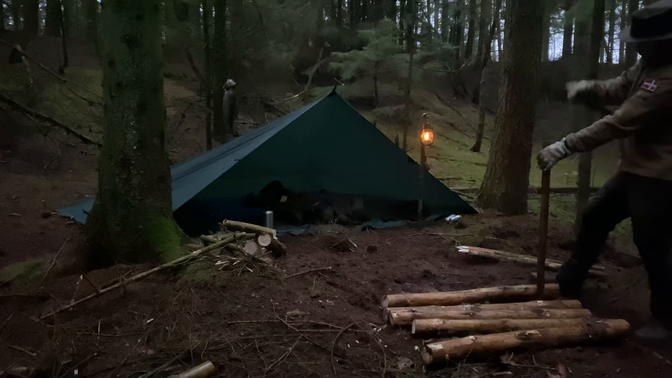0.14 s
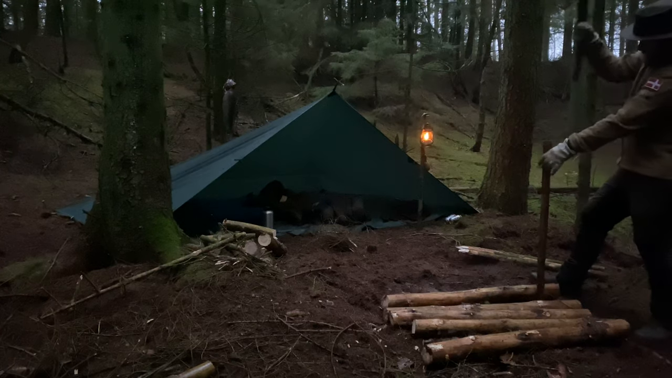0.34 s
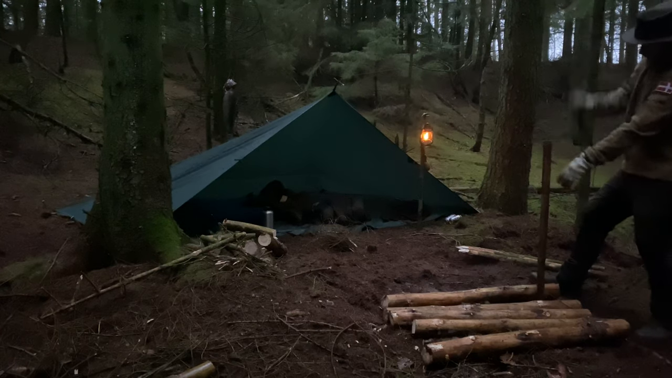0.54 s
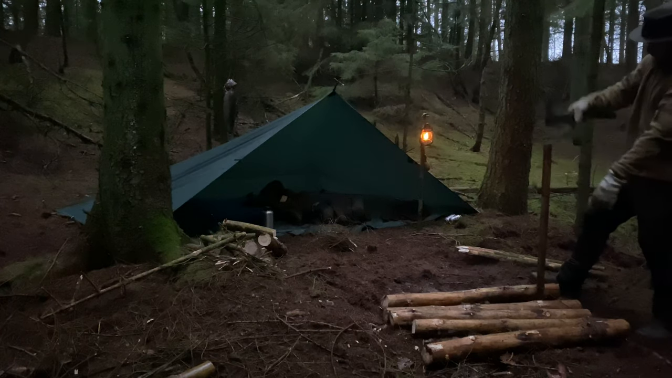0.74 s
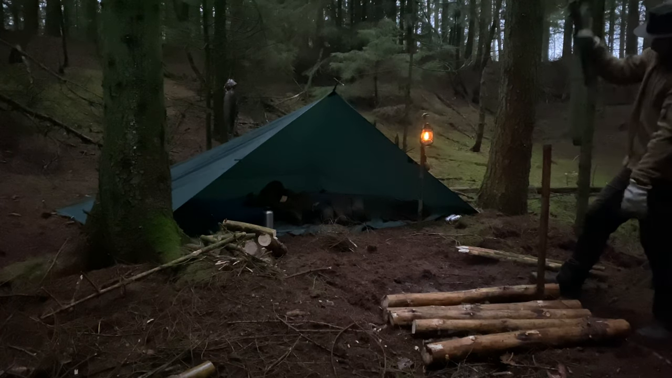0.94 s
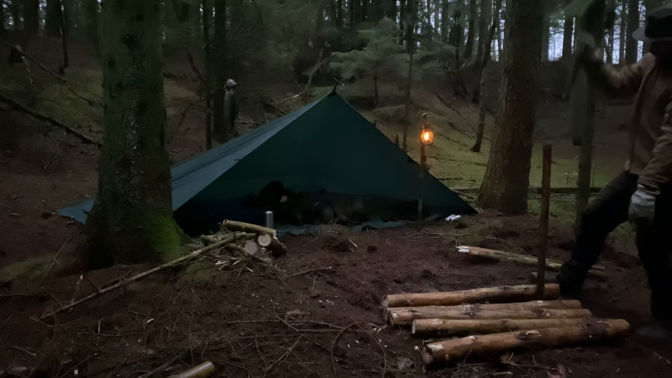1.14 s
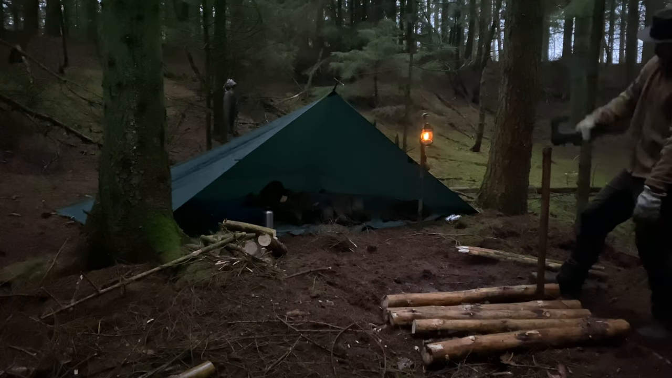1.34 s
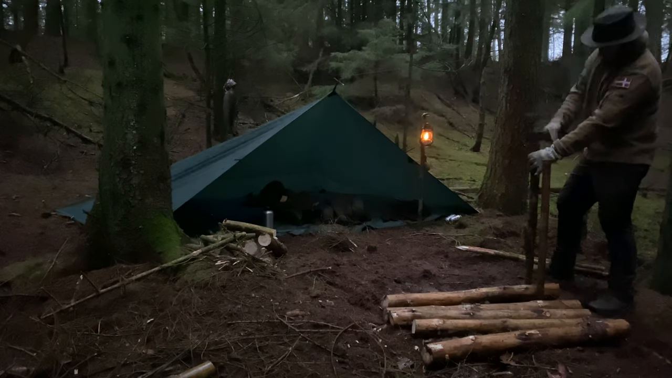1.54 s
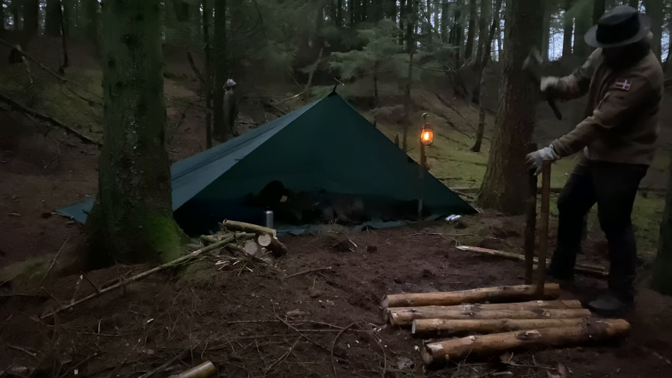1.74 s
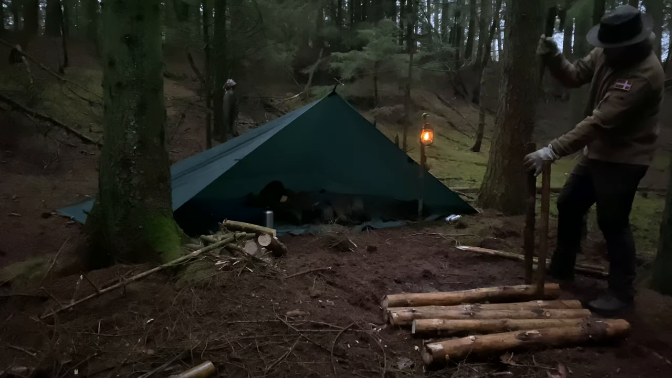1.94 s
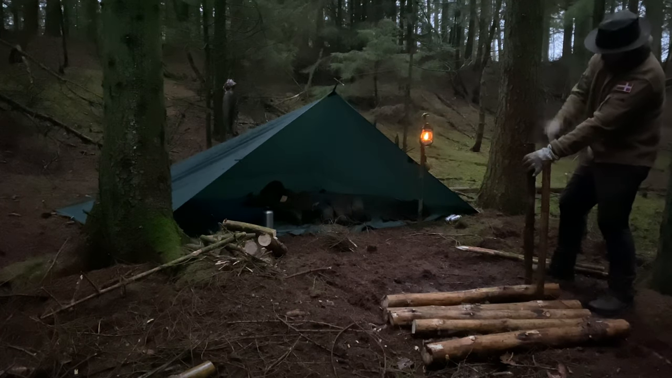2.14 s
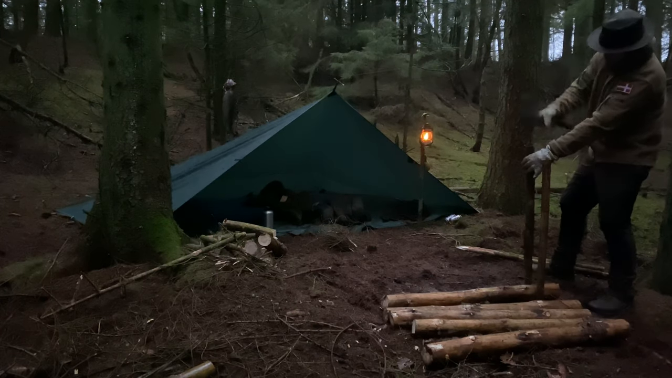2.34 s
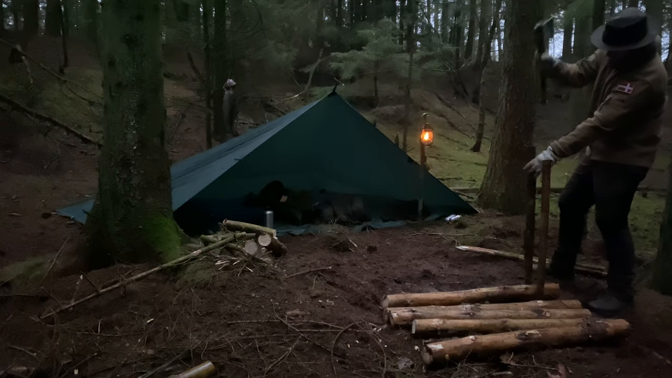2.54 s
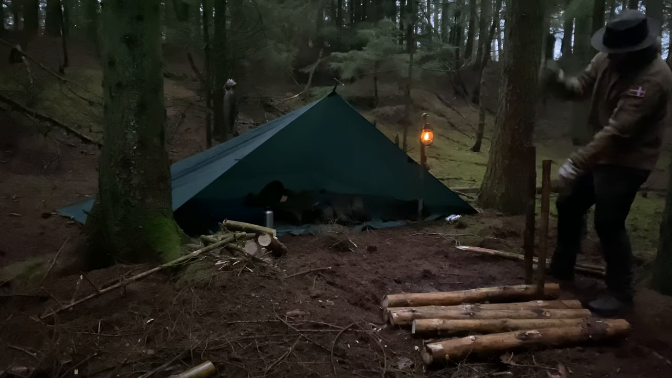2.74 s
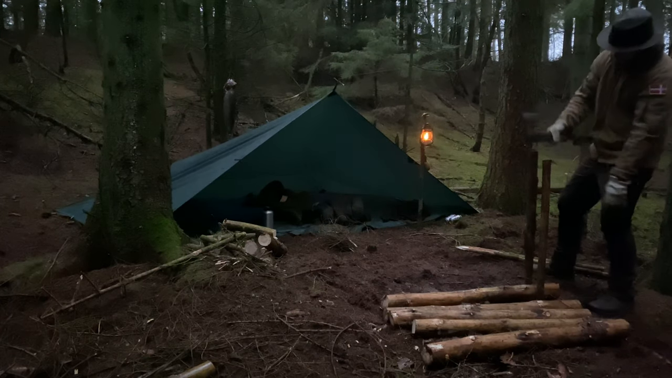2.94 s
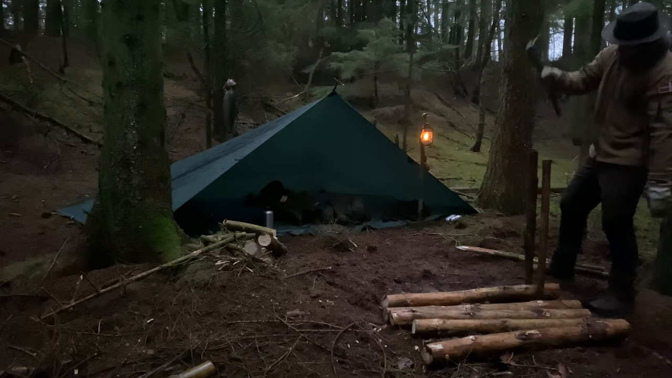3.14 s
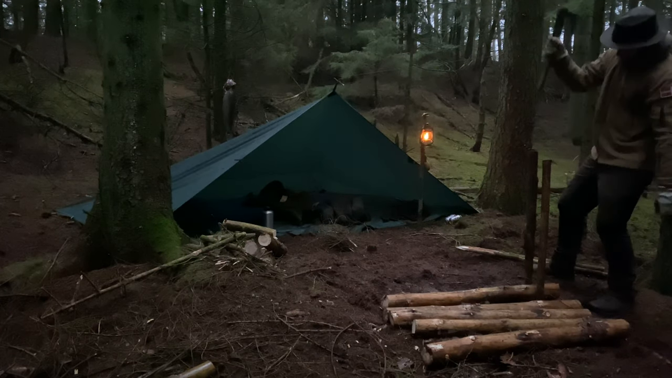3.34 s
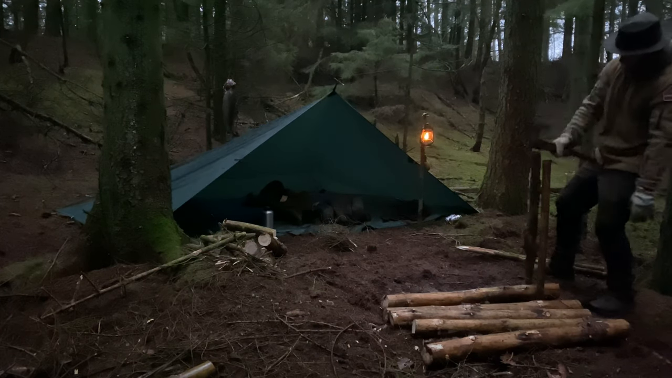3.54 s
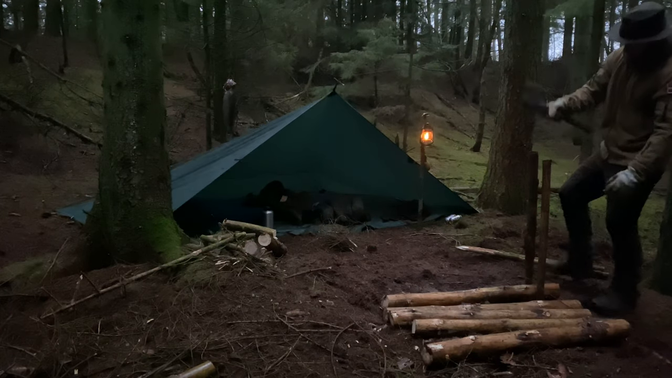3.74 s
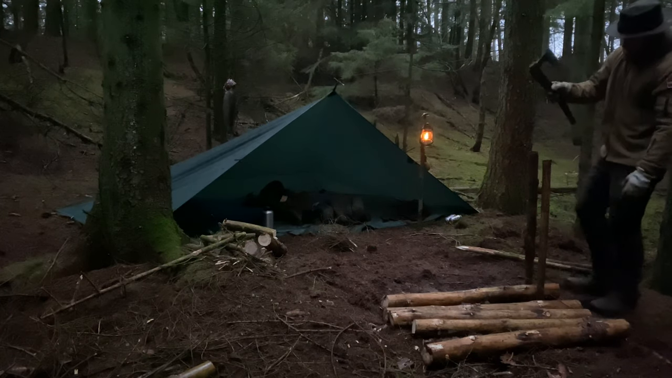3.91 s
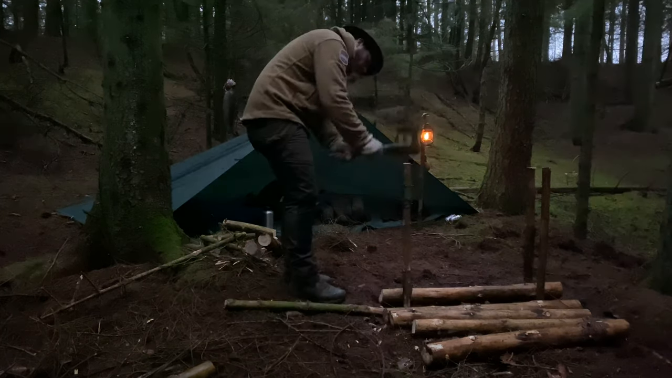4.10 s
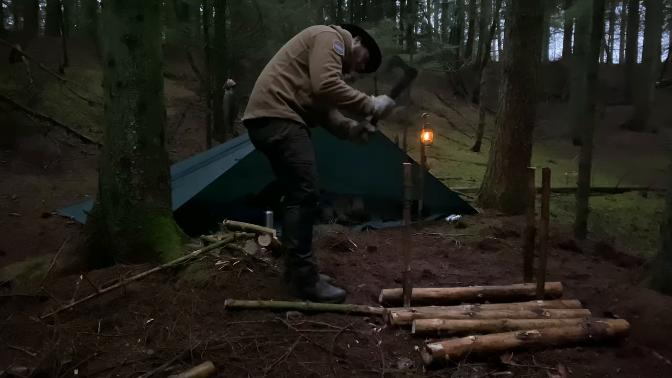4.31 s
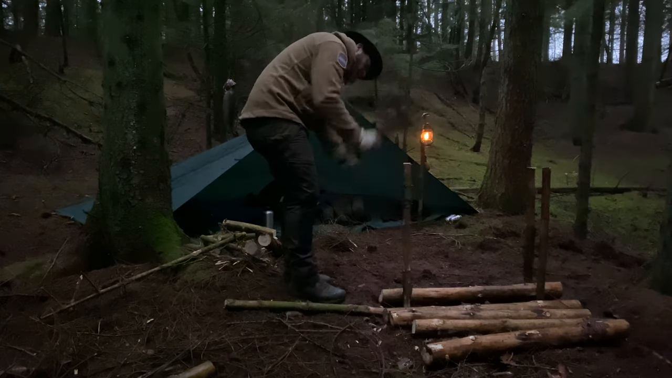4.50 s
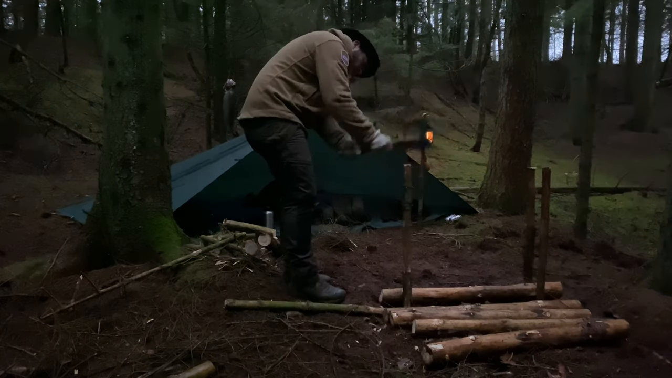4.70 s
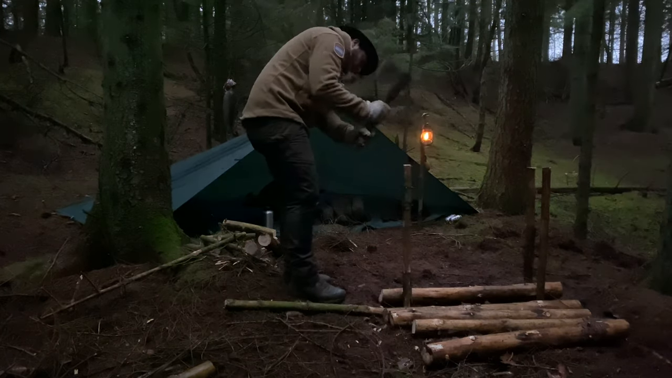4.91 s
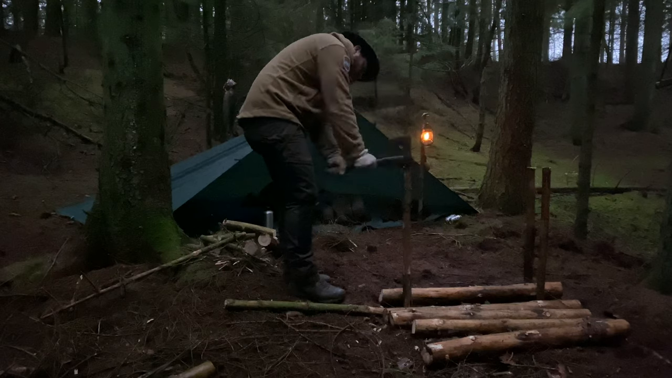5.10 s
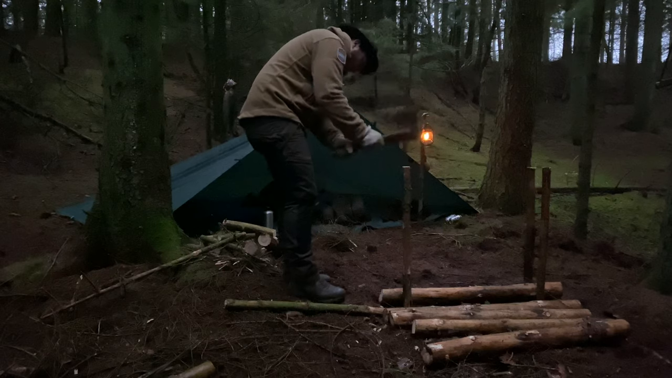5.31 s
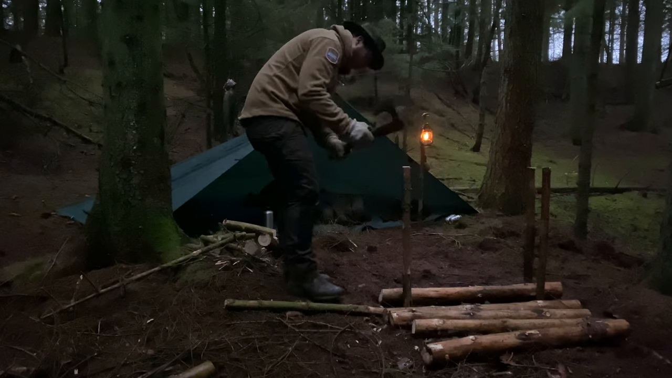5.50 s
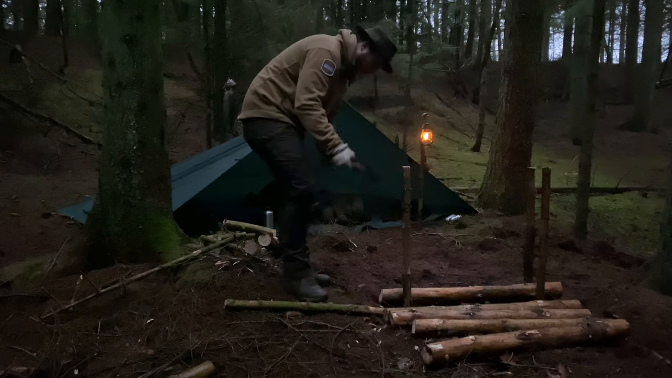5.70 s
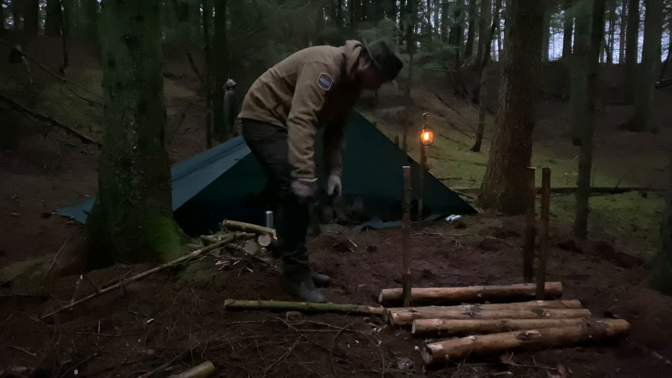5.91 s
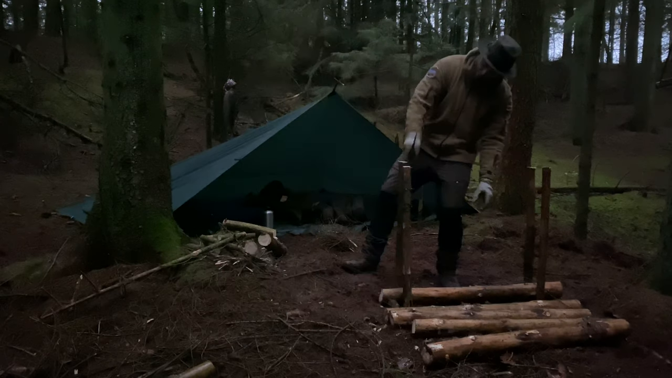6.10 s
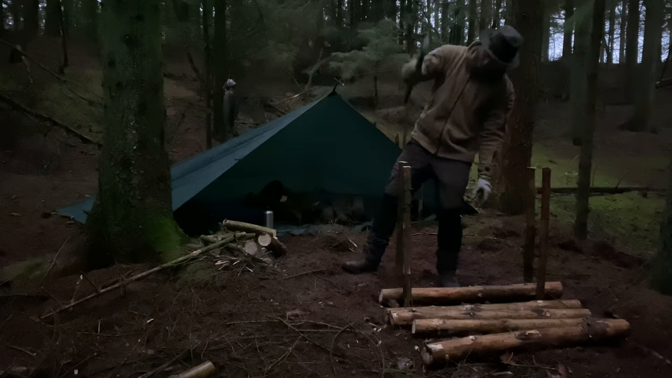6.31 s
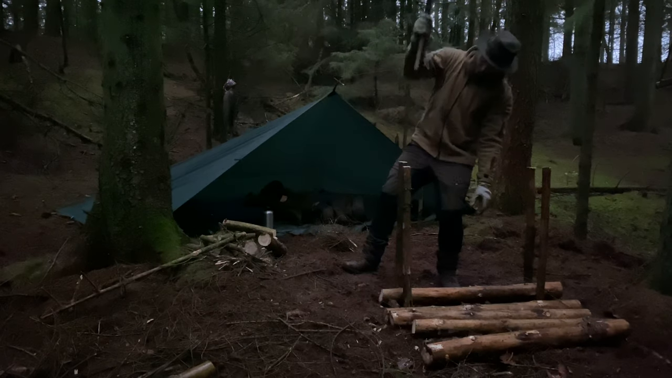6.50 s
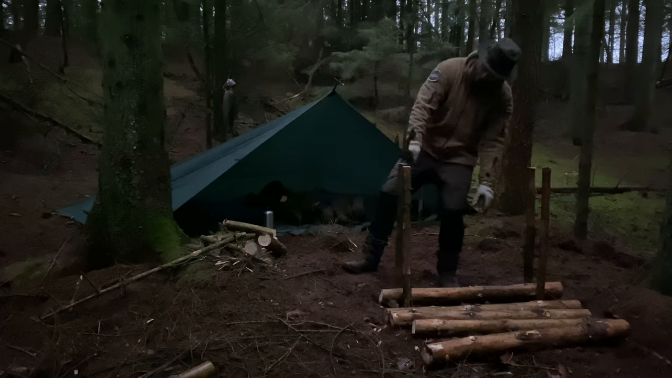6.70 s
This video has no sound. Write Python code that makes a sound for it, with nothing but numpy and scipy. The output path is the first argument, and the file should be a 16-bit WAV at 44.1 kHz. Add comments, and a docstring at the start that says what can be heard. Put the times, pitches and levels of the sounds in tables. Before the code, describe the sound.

Nine spaced, dry axe-back blows on wooden stakes, the last with deep earthy thuds, ring briefly among trees over low wind rumble.

```python
"""Wooden stakes are pounded into soft forest ground with the back of an axe.
Each blow is a burst of cracking noise, a few decaying wood modes, a low thud of the soil and an echo in
frequency-dependent decaying noise. At times an echo breaks off and one enters part-way through its decay.
Air buffets the microphone as short pressure swings over low noise; distant trees hush, and twigs tick
underfoot as tiny noise bursts."""
import sys
import numpy as np
from scipy import signal
from scipy.fft import rfft, irfft, next_fast_len
from scipy.io import wavfile
from scipy.ndimage import map_coordinates

SR = 44100
rng = np.random.default_rng(int(sys.argv[2]) if len(sys.argv) > 2 else 0)


def dump_mix(stems):
    """Bounce the given channels to the path in sys.argv[1] as a 16-bit WAV at rate SR."""
    frames = np.atleast_2d(stems).T  # one column per channel
    limited = np.clip(frames, -1, 1)  # hard clip at full scale
    pcm = np.round(limited * 32767).astype(np.int16)
    wavfile.write(sys.argv[1], SR, pcm)


N = 297663

# Blows of the axe: (time [s], stake [name], knock level [dB], crack level [dB],
# treble tilt [dB], ground thud level [dB], echo level [dB])
BLOWS = [(0.6014, "A", -11.5, -15.5, -1, -22.5, -36.5), (1.2677, "A", -10.5, -12.5, 0.5, -17.5, -35),
         (2.1710, "B", -7.5, -16, -3.5, -22, -36.5), (2.8546, "B", -11.5, -12, -2, -23, -38.5),
         (3.5217, "B", -7.5, -14, -6, -22.5, -39), (4.5603, "C", -8, -10.5, -1.5, -16.5, -38),
         (5.0923, "C", -9, -13.5, 0, -10.5, -40), (6.0463, "D", -22.5, -20.5, -3, -6.5, -34.5),
         (6.6840, "D", -9.5, -9.5, 3, -3.5, -41.5)]
# Echoes that enter part-way: (time [s], stake [name], age of the echo [s], level [dB])
ECHO_ENTRIES = [(0, "A", 0.051, -35), (1.591, "B", 0.14, -32.5), (4.01, "C", 0.018, -37)]
STAKE_NAMES = "ABCD"  # the order of the stakes in the per-stake tables
# Vibration modes of each stake: (frequency [Hz], relative level [dB], 60 dB decay time [s])
STAKE_MODES = [
    [(770, -16, .03), (1028, -1.5, .045), (1140, -11.5, .03), (1374, -6.5, .035), (1584, -3.5, 0.047),
     (1810, -6, 0.049), (1993, -1.5, .045), (2870, -12.5, .03)],
    [(565, -16, 0.014), (720, -13, .03), (1012, -12.5, .03), (1286, -11.5, 0.025), (1660, -10, .04),
     (1880, -18.5, 0.026), (2475, 1, .058), (2645, -4.5, 0.049), (5190, -21, .03)],
    [(620, -6.5, 0.02), (720, 2, 0.029), (1412, -5.5, 0.02), (1620, -2, 0.014), (1850, -6, .025),
     (2304, -10.5, .025), (3214, -6, .025), (3520, -9.5, 0.028)],
    [(529, 1.5, 0.027), (774, -6.5, 0.042), (1430, 1.5, 0.024), (1848, -6, 0.03), (2190, -9, 0.026),
     (2790, -3, 0.02), (3210, -1, 0.01)],
]
# Spectrum of steel cracking on each stake's head: (frequency [Hz], relative density [dB per Hz])
CRACK_SPECTRA = [
    [(60, -18.5), (200, -3), (500, -5), (1100, -2), (1900, 2), (2300, -7.5), (3300, -5), (5500, -17.5),
     (8000, -19.5), (11000, -15), (15000, -28.5)],
    [(60, -17), (200, -7), (400, -11.5), (650, -1.5), (1200, -5), (2500, 0.5), (3200, -5.5), (4200, -15),
     (5700, -9), (8000, -22.5), (11000, -17.5), (15000, -27)],
    [(60, -21), (200, 2.5), (450, 1), (700, 2), (1000, -4), (1600, -3.5), (3400, 0.5), (4500, -14.5),
     (7000, -28), (11000, -20), (15000, -29.5)],
    [(60, -18.5), (250, -17.5), (550, 6.5), (1000, -10), (1800, 2.5), (3200, 1), (4500, -19), (7000, -21.5),
     (11000, -19.5), (15000, -23)],
]
# Where each stake stands: (left-right level difference [dB], lag of the left side [s])
STAKE_PLACES = [(-8.5, .0001), (-3.5, 0.0037), (-3.5, 0), (0, 0.0041)]
# Spectrum of each stake's echo: (frequency [Hz], relative density [dB per Hz])
ECHO_SPECTRA = [
    [(350, -47.5), (600, -14.5), (1550, -9), (1930, -5), (2370, -17), (5630, -21), (10200, -29),
     (12200, -45.5), (13800, -35.5), (14900, -41.5), (16000, -70)],
    [(350, -44.5), (600, -15), (1350, -10), (1610, -9), (1750, -12), (2440, -4), (3120, -13.5),
     (10500, -24), (12000, -43.5), (13900, -35), (16000, -71)],
    [(350, -43.5), (600, -9.5), (737, -0.5), (919, -9), (1290, -7.5), (5120, -9), (8500, -20.5),
     (10600, -17.5), (12000, -47), (13800, -26), (16000, -50.5)],
    [(350, -35.5), (600, -3.5), (1230, -6), (1850, -2), (4460, -11.5), (9360, -19.5), (11200, -23.5),
     (12000, -46.5), (12800, -30), (14500, -24), (16000, -49)],
]
# Note each stake sends sideways into the trees:
# (frequency [Hz], mean level against the echo noise [dB], overtone level against the note [dB])
ECHO_NOTES = [(1887, -12, -21.5), (2470, -8.5, -9), (2605, -19.5, 2), (2250, -20, -24)]
# Reverberation of the forest: (frequency [Hz], 60 dB decay time [s])
FOREST_DECAY = [(300, 0.25), (1000, 0.83), (2200, 1.0), (4000, 0.82), (7000, 0.53), (10000, .5),
                (15000, .39)]
# Strongest puffs of air: (time [s], base level [dB], slow swing against the flick, before gains [dB])
PUFFS = [(0.223, -29, -8), (0.334, -30, -6), (0.38, -21.5, -5.5), (0.608, -18, -8.5), (0.961, -22.5, -6),
         (1.081, -26, -9.5), (1.114, -22, -9), (1.894, -24.5, -9.5), (2.102, -26.5, -6.5), (2.409, -29, -9),
         (3.025, -26, -9), (3.333, -26.5, -11), (4.391, -33.5, -4), (4.465, -26, -10.5), (5.699, -29, -9.5),
         (6.61, -26.5, 0)]
# Course of the breeze, before gains: (time [s], rumble level [dB], flutter level [dB])
BREEZE_COURSE = [(0.0, -54.5, -59), (0.52, -51, -53), (1.5, -47.5, -48.5), (1.65, -51, -48),
                 (2.3, -57, -54.5), (2.85, -47.5, -47.5), (3.26, -49.5, -52.5), (3.54, -50, -49.5),
                 (3.91, -51, -50), (4.13, -62, -67), (4.96, -59.5, -67.5), (5.2, -46.5, -52),
                 (5.58, -55.5, -52), (5.87, -48, -59.5), (5.98, -50, -58.5), (6.39, -48, -68.5),
                 (6.54, -40, -59.5), (6.65, -38.5, -48.5)]
# Spectrum of the deep turbulence: (frequency [Hz], relative density [dB per Hz])
RUMBLE_SPECTRUM = [(20, -24), (35, -13.5), (55, 3), (90, 1), (140, -2), (220, -18), (400, -62.5)]
# Spectrum of the quicker turbulence: (frequency [Hz], relative density [dB per Hz])
FLUTTER_SPECTRUM = [(70, -21.5), (140, -0.5), (220, 0.5), (320, -10.5), (450, -20), (700, -41),
                    (1200, -70.5)]
# Spectrum of distant trees: (frequency [Hz], relative density [dB per Hz])
HUSH_SPECTRUM = [(100, -10.5), (300, -1), (700, -6), (1500, -12), (2200, -19.5), (4000, -28.5),
                 (7000, -36.5), (11000, -40.5), (16000, -51.5)]
# Loudest twigs underfoot: (time [s], level before gain [dB], pitch [Hz])
TWIGS = [(0.3299, -53.5, 4760), (0.8613, -48, 4080), (3.9434, -52, 14100), (5.7314, -51.5, 9130),
         (6.574, -43, 7740), (6.6314, -59, 4510)]

# Small eddies: rate, level over the breeze and its scatter
EDDIES_PER_S, EDDY_DB, EDDY_SPREAD_DB = 12, 16.5, 2
# Nominal pitch range of their flicks, nominal pitch of their slow swings
EDDY_LOW_HZ, EDDY_HIGH_HZ, EDDY_SLOW_HZ = 127, 290, 78
SWING_LAG_S = .004  # delay of the slow swing in a puff or eddy
# Fainter twig snaps at random moments: rate, mean level and its scatter, median pitch
FAINT_SNAPS_PER_S, FAINT_SNAP_DB, FAINT_SNAP_SPREAD_DB, FAINT_SNAP_HZ = 1.4, -61.5, 1.5, 5150
TOP_HZ = 16400  # nothing is passed above this


def amp(db):
    """Logarithmic level: decibels become an amplitude ratio."""
    return 10 ** (np.asarray(db) / 20)


def unit(x):
    """Normalization of power: scale to rms 1."""
    return x / np.sqrt(np.mean(x ** 2) + 1e-20)


def along(points, hz):
    """Logarithmic pitch scale: interpolate (frequency [Hz], value) points along it."""
    f, value = np.transpose(points)
    return np.interp(np.log(hz + 1), np.log(f + 1), value)


def filtered(x, response):
    """Linear filtering: multiply the spectrum of x by a response of frequency."""
    n = x.shape[-1]
    padded = next_fast_len(n + 8192)
    spectrum = rfft(x, padded) * response(np.fft.rfftfreq(padded, 1 / SR))
    return irfft(spectrum, padded)[..., :n]


def noise(spectrum, n, alike):
    """Partial coherence: coloured stereo noise of rms 1, sharing the power fraction alike."""
    share = np.clip(alike, 0, 1)
    common = np.sqrt(share) * rng.standard_normal(n)
    separate = np.sqrt(1 - share) * rng.standard_normal((2, n))
    return unit(filtered(common + separate, lambda hz: amp(along(spectrum, hz))))


def wobble(rate, n):
    """Slow random modulation: a smooth curve through rate random knots a second."""
    knots = rng.standard_normal(int(n * rate / SR) + 4)
    return map_coordinates(knots, [np.arange(n) * rate / SR])


def fade(t, t60):
    """Exponential decay: 60 dB in t60, at full level before t = 0."""
    return np.exp(-np.log(1000) * np.maximum(t, 0) / t60)


def onset(t, time_constant):
    """Exponential approach: rise from silence towards full level."""
    return 1 - np.exp(-t / time_constant)


def panned(db):
    """Interaural level difference: left and right gains that differ by db."""
    return amp([[db / 2], [-db / 2]])


def add(out, s, x):
    """Superposition: mix x into out from time s."""
    start = max(round(s * SR), 0)
    out[:, start:start + x.shape[1]] += x[:, :N - start]


def chance_times(per_s):
    """Jittered timing: one random moment in each slot of 1 / per_s seconds."""
    slots = np.arange(int(per_s * N / SR))
    return (slots + rng.random(len(slots))) / per_s


def spectral_line(hz, width_hz, n):
    """Narrow-band resonance: stereo noise of rms 1 gathered around one frequency."""
    return unit(filtered(rng.standard_normal((2, n)), lambda f: 1 / (1 + ((f - hz) / width_hz) ** 2)))


def echo(stake, width_hz=55, note_t60=1.5, near_db=3):
    """Diffuse reverberation off trunks: lows and high treble die sooner than the middle; the note lasts."""
    n = 3 * SR // 2
    t = np.arange(n) / SR
    # each band of the noise decays at its own rate
    hz, frames, bands = signal.stft(noise(ECHO_SPECTRA[stake], n, alike=.05), SR, nperseg=256)
    decay = fade(frames, along(FOREST_DECAY, hz)[:, None])
    wash = signal.istft(bands * decay, SR, nperseg=256)[1][:, :n]
    note_hz, note_db, overtone_db = ECHO_NOTES[stake]
    fundamental = spectral_line(note_hz, width_hz, n) * fade(t, note_t60)
    overtone = spectral_line(2 * note_hz, 2 * width_hz, n) * fade(t, 0.54 * note_t60)
    note = fundamental + amp(overtone_db) * overtone
    # near trunks answer first and loudest, far ones in uneven clumps
    near = 1 + amp(near_db) * fade(t, 0.2)
    clumps = amp(wobble(45, n) - 4.5)
    return (wash + amp(note_db + 2 * wobble(20, n)) * note) * onset(t, 0.0027) * near * clumps


def entering_echoes():
    """Late reverberation: echoes that enter part-way through their decay."""
    out = np.zeros((2, N))
    for s, name, age, db in ECHO_ENTRIES:
        tail = echo(STAKE_NAMES.index(name))[:, round(age * SR):]
        add(out, s, amp(db) * tail * onset(np.arange(tail.shape[1]) / SR, 0.0023))
    return out


def breeze(rumble_gain_db=6.0, flutter_gain_db=-3, hush_db=-59.5, hush_follows=0.28):
    """Turbulent pressure noise: lumpy low wind, over a hush of distant trees that swells a little with it."""
    knots, *levels = np.transpose(BREEZE_COURSE)
    rumble_db, flutter_db = [np.interp(np.arange(N) / SR, knots, level) for level in levels]
    lumps = wobble(28, N)
    rumble = amp(rumble_db + lumps + rumble_gain_db) * noise(RUMBLE_SPECTRUM, N, alike=.3)
    flutter = amp(flutter_db + 8.3 * lumps + flutter_gain_db) * noise(FLUTTER_SPECTRUM, N, alike=0.94)
    hush_level_db = hush_db + hush_follows * (flutter_db - flutter_db.mean())
    hush = amp(hush_level_db) * noise(HUSH_SPECTRUM, N, alike=.2)
    return (rumble + flutter) * panned(3) + hush


def swing(hz, cycles=.8):
    """Vortex pressure pulse: a swing of a cycle or two, a little different on each side."""
    turns = hz * np.exp(rng.normal(0, .12)) * np.arange(SR // 8) / SR
    swell = (turns / cycles) ** 3 * np.exp(3 - 3 * turns / cycles)  # peaks at 1 after the given cycles
    phase = rng.uniform(0, 2 * np.pi) + rng.normal(0, 0.28, (2, 1))
    return swell * np.sin(2 * np.pi * turns + phase)


def eddies(slow_db=-3):
    """Random vortex impacts: small eddies bump the microphone, harder as the breeze grows."""
    out = np.zeros((2, N))
    knots, rumble_db, flutter_db = np.transpose(BREEZE_COURSE)
    for s in chance_times(EDDIES_PER_S):
        size_db = EDDY_DB + rng.normal(0, EDDY_SPREAD_DB)
        flick_db = np.interp(s, knots, flutter_db) + size_db
        add(out, s, amp(flick_db) * swing(rng.uniform(EDDY_LOW_HZ, EDDY_HIGH_HZ)))
        swing_db = np.interp(s, knots, rumble_db) + size_db + slow_db
        add(out, s + SWING_LAG_S, amp(swing_db) * swing(EDDY_SLOW_HZ))
    return out * panned(2.9)


def puffs(flick_hz=245, slow_hz=80, flick_db=-1, slow_db=6, trail_db=-8, count=3):
    """Gust breaking into vortices: a quick flick, a slow swing and a few small eddies around them."""
    out = np.zeros((2, N))
    for s, db, weight_db in PUFFS:
        add(out, s + .002, amp(db + flick_db) * swing(flick_hz))
        add(out, s + SWING_LAG_S, amp(db + weight_db + slow_db) * swing(slow_hz))
        for delay, hz in rng.uniform([-.03, EDDY_LOW_HZ], [.03, EDDY_HIGH_HZ], (count, 2)):
            add(out, s + delay, amp(db + trail_db) * swing(hz))
    return out * panned(2.5)


def snap(hz, t60=0.017):
    """Brittle fracture: dry wood breaks in a tiny splintering noise burst."""
    t = np.arange(SR // 10) / SR
    colour = [(hz / 8, -10), (hz / 2, -4), (hz, 0), (hz * 2, -7), (hz * 4, -12)]
    splinters = amp(2.3 * wobble(600, len(t)))
    return splinters * fade(t, t60) * noise(colour, len(t), alike=0.59)


def twigs(gain_db=-3):
    """Scattered fractures: the loudest twigs snap underfoot at set moments, and fainter twigs snap at random
    moments."""
    out = np.zeros((2, N))
    for s, db, hz in TWIGS:
        add(out, s, amp(db + gain_db) * snap(hz))
    for s in chance_times(FAINT_SNAPS_PER_S):
        faint_hz = FAINT_SNAP_HZ * np.exp(rng.normal(0, .4))
        add(out, s, amp(rng.normal(FAINT_SNAP_DB, FAINT_SNAP_SPREAD_DB)) * snap(faint_hz))
    return out


def stake_ring(stake, t, lag):
    """Modal vibration: the struck stake rings as a sum of decaying sinusoids."""
    heard = t - np.array([[lag], [0]])  # the waves on the left side lag
    ring = np.zeros((2, len(t)))
    for k, (hz, db, t60) in enumerate(STAKE_MODES[stake]):
        phase = np.pi * k + rng.normal(0, 0.084, (2, 1))  # neighbouring modes have opposite signs
        level = amp(db + rng.normal(0, 0.48))
        ring += level * fade(t, t60) * np.sin(2 * np.pi * hz * heard + phase)
    return ring


def knock(stake, knock_db, crack_db, treble_db, pan_db, lag,
          contact=0.0046, rise=0.00046, swell=0.00092, crack_t60=0.023, touch_db=-4):
    """Impact excitation: the axe crushes the stake's head for milliseconds, and the stake rings briefly."""
    t = np.arange(SR // 4) / SR
    ring = amp(knock_db) * panned(pan_db) * onset(t, swell) * stake_ring(stake, t, lag)
    # a square blow is brighter than a glancing one
    colour = [(hz, db + treble_db * (hz > 4000)) for hz, db in CRACK_SPECTRA[stake]]
    crack = noise(colour, len(t), alike=.3) * fade(t - contact, crack_t60) * panned(pan_db * .5)
    # the first touch of steel is the brightest instant
    touch = noise([(1500, -26.5), (5000, 2), (15000, -8)], len(t), alike=.2) * fade(t, 0.0098)
    touch *= amp(touch_db + treble_db)
    return ring + amp(crack_db) * (touch + crack) * onset(t, rise)


def scattered(x, db=-14, t60=.11, delay=.007):
    """Early reflection: the ground, the log pile and the nearest trunks thicken a knock."""
    t = np.arange(SR // 5) / SR
    colour = [(100, -7), (500, 1), (1500, -2), (4000, 2.5), (15000, -2)]
    paths = noise(colour, len(t), alike=0.62) * fade(t - delay, t60) * (t > delay)
    paths /= np.linalg.norm(paths[0])
    return x + amp(db) * signal.fftconvolve(x, paths, axes=1)[:, :x.shape[1]]


def thud(hz=143, t60=.065, delay=.006, crumble_db=-15):
    """Damped oscillation: the stake's tip shoves the springy soil, which swings a few times and crumbles."""
    t = np.maximum(np.arange(SR // 4) / SR - delay, 0)
    shove = -np.sin(2 * np.pi * hz * t) * fade(t, t60) * panned(-2)
    colour = [(25, -16), (60, 2), (220, -3), (400, -18), (900, -42.5)]
    crumble = noise(colour, len(t), alike=0.75) * fade(t, 0.12)
    return (shove + amp(crumble_db) * crumble) * onset(t, 0.0058)


def pounding():
    """Superposed impact responses: knock, thud and echo; an echo breaks off where another enters part-way."""
    out = np.zeros((2, N))
    for s, name, knock_db, crack_db, treble_db, thud_db, echo_db in BLOWS:
        stake = STAKE_NAMES.index(name)
        add(out, s, scattered(knock(stake, knock_db, crack_db, treble_db, *STAKE_PLACES[stake])))
        add(out, s, amp(thud_db) * thud())
        end = min([entry[0] for entry in ECHO_ENTRIES if entry[0] > s], default=N / SR)
        add(out, s, amp(echo_db) * echo(stake)[:, :round((end - s) * SR)])
    return out


def dips(width=.009):
    """Amplitude modulation: the level dips briefly just before each later echo entry."""
    t = np.arange(N) / SR
    gains = [amp(-11 * np.exp(-((t - s + .012) / width) ** 2)) for s, *_ in ECHO_ENTRIES[1:]]
    return np.prod(gains, axis=0)


def scene():
    """Linear superposition: all sounds of the clearing in stereo, under the brief dips."""
    air = breeze() + eddies() + puffs()
    return (entering_echoes() + air + twigs() + pounding()) * dips()


def record(dry, top=0.92):
    """Filtering and saturation: deep bass is weakened, a narrow notch cut near 12 kHz, peaks rounded off."""
    response = [(18, -17), (45, -0.5), (10500, 0.5), (11400, -4.5), (12100, -10.5), (13000, 2),
                (14800, -1.5), (16000, -13)]  # (frequency [Hz], gain [dB])
    x = filtered(dry, lambda hz: amp(along(response, hz)))
    x = x / (1 + np.abs(x / top) ** 6) ** (1 / 6)  # soft saturation towards top
    return filtered(x, lambda hz: np.clip((TOP_HZ - hz) / 600, 0, 1))  # band limit


dry = scene()
out = record(dry)
dump_mix(out)
```